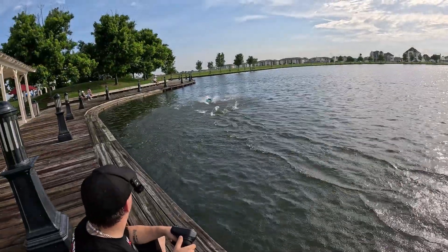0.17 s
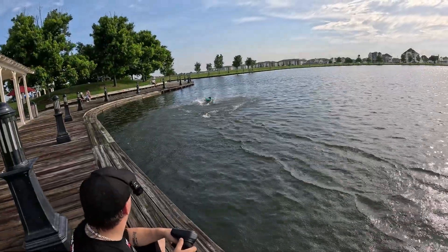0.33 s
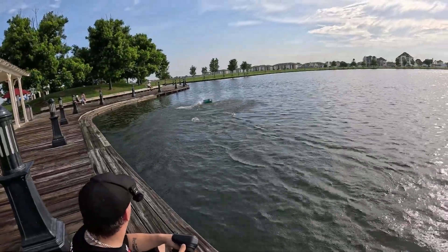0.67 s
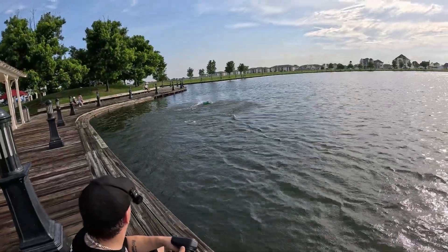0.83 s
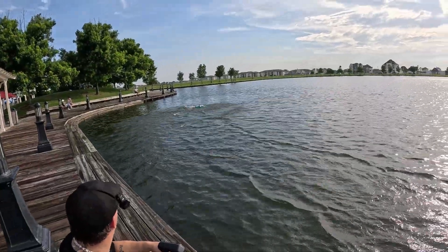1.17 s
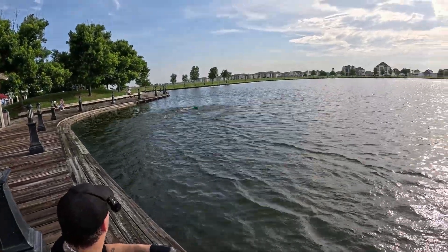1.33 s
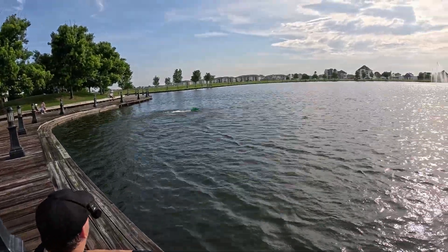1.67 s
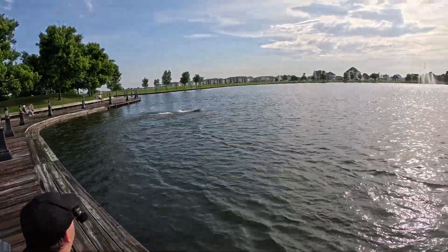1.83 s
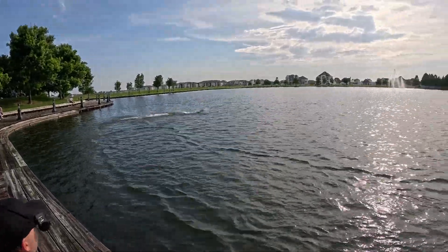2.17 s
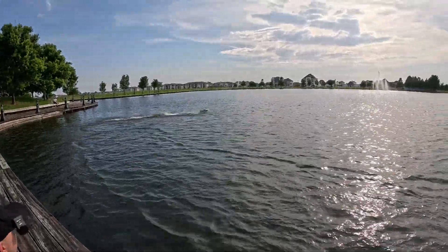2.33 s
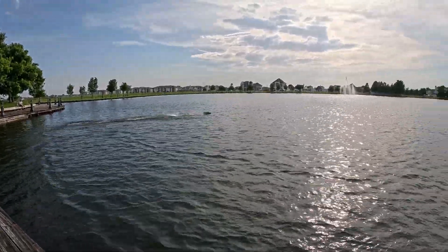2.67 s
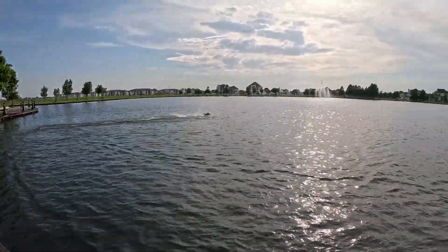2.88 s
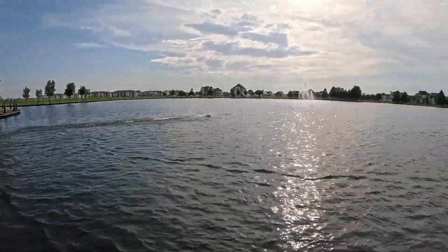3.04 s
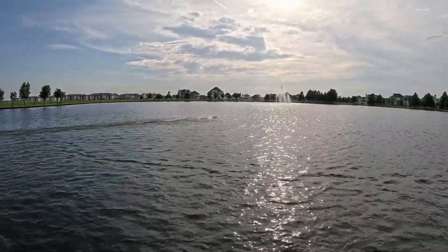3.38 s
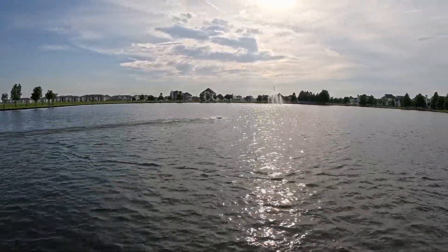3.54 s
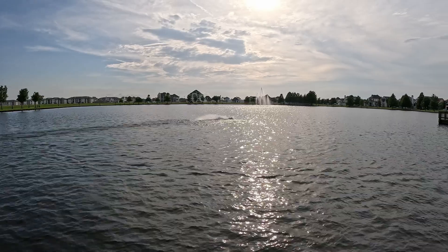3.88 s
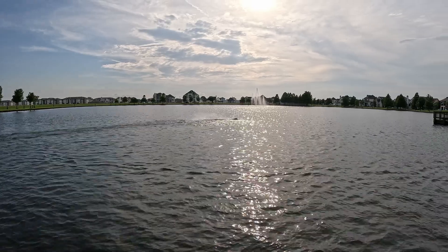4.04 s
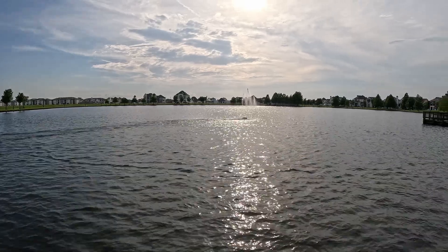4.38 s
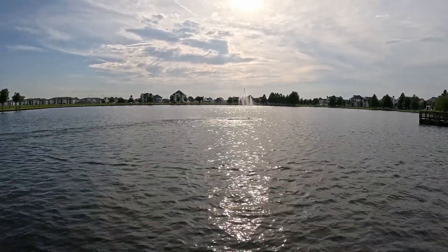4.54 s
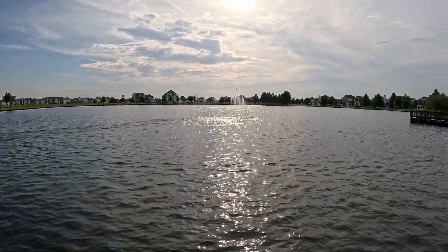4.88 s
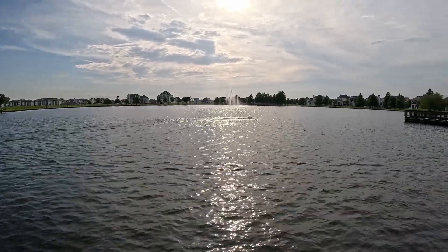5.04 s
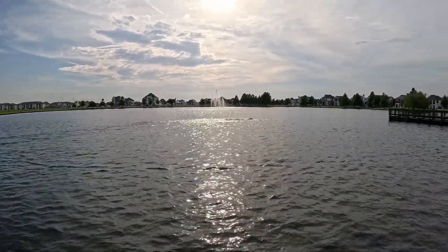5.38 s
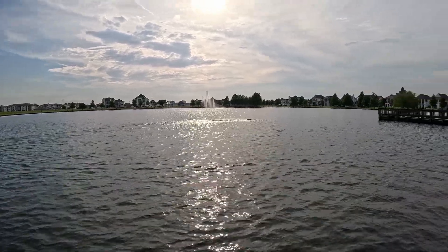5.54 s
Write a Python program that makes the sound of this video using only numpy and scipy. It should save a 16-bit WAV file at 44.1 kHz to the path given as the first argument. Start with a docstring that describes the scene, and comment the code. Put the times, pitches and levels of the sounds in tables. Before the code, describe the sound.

Outdoors on a pond dock, with a soft, steady lakeside wash and ripples lapping below. At 0-0.1 s a tight cluster of wet slaps lands, with drops pattering and thinning out; more slaps come near 0.5 and 0.8 s. At about 1.15 s a small electric jet boat spins up quickly to a buzzy mid-low whine with churning water and hissing spray. From 1.6 to 3.2 s the whine repeatedly leaps higher as the hull skips clear, then drops back with hollow, splashy slaps. It winds down by 3.3 s. A short burst at 3.6-3.95 s jumps sharply, then falls. Calm lapping follows, with a close, bright plastic creak of quickening ticks at 4.25 s and small slaps from 4.6 s. A last burst runs 5.0-5.5 s, with a fainter creak at 5.17 s and soft slaps, then water. A thin, dull echo returns from the bank.

```python
"""Watery slaps, pattering drops and lapping come first; then a small electric jet boat runs across a pond.
One long burst of throttle and two short ones drive an impeller whine, built from multiples of the shaft rate.
The whine races when the hull skips clear; churn and spray are shaped droplet noise, and hull slaps ring and splash.
A thin echo returns from the far bank, something near the microphone creaks twice in ringing ticks,
and a soft lakeside wash of filtered noise lies behind it all."""
import sys
import numpy as np
from scipy import signal
from scipy.fft import rfft, irfft
from scipy.io import wavfile
from scipy.ndimage import uniform_filter1d, map_coordinates

SR = 44100
rng = np.random.default_rng(int(sys.argv[2]) if len(sys.argv) > 2 else 0)


def unload_audio(sound):
    """Save the sound as a 16-bit wav file, at the path given as the first command line argument."""
    columns = np.transpose(np.atleast_2d(sound))
    # keep every value between -1 and 1, then stretch to whole-number steps
    steps = np.round(np.clip(columns, -1, 1) * 32767)
    wavfile.write(sys.argv[1], SR, steps.astype(np.int16))


N = 251811
T = np.arange(N) / SR


def undb(db):
    """Decibels to gain."""
    return 10 ** (np.asarray(db) / 20)


def unit(x):
    """Scale to an rms of 1."""
    return x / np.sqrt(np.mean(x ** 2) + 1e-24)


def colour(x, points):
    """Filter by a spectrum of (frequency [Hz], level [dB]) points, to an rms of 1."""
    hz, db = np.transpose(points)
    bins = np.maximum(np.fft.rfftfreq(len(x), 1 / SR), 1)
    gain = undb(np.interp(np.log(bins), np.log(hz), db))
    return unit(irfft(rfft(x) * gain, len(x)))


def resonate(x, hz, width):
    """Two-pole resonance with gain 1 at its centre."""
    return signal.lfilter(*signal.iirpeak(hz, hz / width, fs=SR), x)


def resonate_twice(x, hz, width):
    """The same resonance passed twice, for steeper sides."""
    return resonate(resonate(x, hz, width), hz, width)


def walk(rate):
    """Smooth chance with a spread near 1, changing rate times a second."""
    k = max(int(SR / rate), 1)
    steps = np.repeat(rng.standard_normal(N // k + 1), k)
    return 1.46 * uniform_filter1d(uniform_filter1d(steps, k), k)[:N]


def drops(rate, spread_db):
    """Random droplet impacts, rate a second on average: many small ones and a few large."""
    size = undb(spread_db * np.minimum(rng.exponential(size=N), 5))
    return unit((rng.random(N) < rate / SR) * size * rng.standard_normal(N))


def add(out, s, x):
    """Mix a short sound in at time s."""
    i = int(s * SR)
    out[i:i + len(x)] += x[:N - i]


def curve(points):
    """Join rows of (time [s], value, ..) by straight lines; one track for each value."""
    s, *columns = np.transpose(points)
    return [np.interp(T, s, c) for c in columns]


def lag(x, seconds):
    """Follow x with a time constant."""
    keep = np.exp(-1 / (seconds * SR))
    return signal.lfilter([1 - keep], [1, -keep], x)


# spectrum of the distant wash: (frequency [Hz], relative density [dB per Hz])
WASH_SPECTRUM = [(20, -38), (45, -6), (75, 6.5), (165, -9), (260, 7), (420, -11), (700, 1), (1300, -13),
                 (2000, -17), (3000, -11.5), (5500, -15.5), (8000, -22), (11000, -27), (15500, -40)]


def lakeside(wash_db=-66.5, lap_db=-69.5):
    """A distant fountain and town wash as steady noise, with ripples lapping under the dock as droplets."""
    wash = colour(rng.standard_normal(N), WASH_SPECTRUM) * undb(wash_db + 0.16 * walk(rate=3.93))
    lap_spectrum = [(40, -40), (110, 0.0), (165, 6.0), (260, -7.5), (700, -11.0), (3000, -40)]
    lapping = colour(drops(rate=370, spread_db=0.0), lap_spectrum)
    # the boat's first wash is still slopping against the piles at the start
    slop_db = np.interp(T, [0, 0.6, 4], [5, 1.5, 0])
    ripple_db = 2 * walk(rate=14)
    return wash + lapping * undb(lap_db + slop_db + ripple_db)


def pond(x, echo_db=-17, t60=0.99, first_s=0.036):
    """The dock and the tree-lined bank scatter a thin, dull echo, as sparse decaying reflections."""
    t = np.arange(SR) / SR
    scatter = rng.standard_normal(SR) * (rng.random(SR) < .01)
    tail = colour(scatter, [(100, -10), (400, 0.5), (2000, 3), (6000, -17), (14000, 0.5)])
    tail = tail * (t > first_s) * np.exp(-np.log(1000) * t / t60)
    return x + undb(echo_db) * signal.fftconvolve(x, tail / np.linalg.norm(tail))[:N]


# the two creaks: (start [s], length [s], first gap between slips [s],
#                  body level before trim [dB], top-octave level before trim [dB])
CREAK_STARTS = [(4.254, 0.135, 0.0224, -33.5, -47.5), (5.165, 0.043, 0.017, -40.5, -58.5)]
# each gap is shorter, each slip weaker, every second one fuller in the body
SLIP_QUICKEN_S, SLIP_FADE_DB, SLIP_ALTERNATE_DB = 0.002, 2.1, 8.5


def slips(count=10):
    """Stick-slip timing, ever faster and weaker: yields (time [s], body level [dB], top level [dB])."""
    for start, length, first_gap, db, top_db in CREAK_STARTS:
        for k in range(count):
            after = k * (first_gap - SLIP_QUICKEN_S * (k - 1) / 2)
            if after > length:
                break
            fade_db = SLIP_FADE_DB * k
            yield start + after, db - fade_db + SLIP_ALTERNATE_DB * (k % 2), top_db - fade_db


# ringing modes of the stiff plastic: (frequency [Hz], width [Hz], relative level [dB])
PLASTIC_MODES = [(1065, 140, -18), (2524, 370, -7.5), (4813, 360, -7.5), (5335, 180, -2.5),
                 (6350, 790, -8.5), (7340, 660, -6.5), (8770, 500, -3.5), (9450, 680, 2), (10540, 790, -3)]
# spectrum of one scrape: (frequency [Hz], relative density [dB per Hz])
SCRAPE_SPECTRUM = [(500, -10), (2000, -2), (6000, 0), (11000, -2), (13000, -10), (16000, -20)]


def creak(low_db=-13, high_db=-3, scrape_s=0.00051, tail_db=-19, tail_s=0.0046, crack_db=-9):
    """Stiff plastic slips in quickening ticks; each is a tiny bright scrape that rings the same short modes."""
    out, t = np.zeros(N), np.arange(SR // 40) / SR
    decay = np.exp(-t / scrape_s) + undb(tail_db) * np.exp(-t / tail_s)
    for s, db, top_db in slips():
        scrape = colour(rng.standard_normal(len(t)), SCRAPE_SPECTRUM) * decay
        add(out, s, undb(top_db + crack_db) * unit(scrape))
        for k, (hz, width, mode_db) in enumerate(PLASTIC_MODES):
            # high modes follow the top-octave level, the rest the body; polarity alternates
            strength_db = top_db + high_db if hz > SR / 6 else db + low_db
            ring = unit(resonate(scrape, hz, width)) / 2
            add(out, s, (-1) ** k * undb(strength_db + mode_db) * ring)
    return out


def patter(patter_db=-64, fade_s=0.86):
    """Single drops fall back near the dock as broad, damped plinks and thin out."""
    plinks = resonate(drops(rate=110, spread_db=2), 3300, 6000)
    bright = colour(plinks, [(300, 2), (1200, 9), (3000, 4.0), (7000, 2), (15000, -9)])
    return undb(patter_db) * bright * np.exp(-T / fade_s)


# the way from boat to dock: (time [s], lag of the bounce [s], strength of the bounce [gain], treble lift [dB])
BOAT_PATH = [(0, 0.0011, 0.11, 9.5), (1.7, 0.0008, 0.05, 2), (2.8, 0.00094, 0.17, 2),
             (3.75, 0.00086, 0.23, 1), (4.5, 0.000806, 0.21, 4.5), (5.25, 0.0007, 0.091, 1)]


def path(x):
    """A bounce off the dock combs the sound, its detour shifting as the boat moves; the treble lift shifts too."""
    detour, strength, treble_db = curve(BOAT_PATH)
    top = signal.sosfiltfilt(signal.butter(2, 7500, "high", fs=SR, output="sos"), x)
    x = x + (undb(treble_db) - 1) * top
    return x + strength * map_coordinates(x, [(T - detour) * SR], order=3)


# hull slaps and splashes: (time [s], rise [s], length [s], body level before trim [dB], cavity tone [Hz],
#   cavity ring against the body [dB], thump level before trim [dB], spray level before trim [dB])
HULL_SLAPS = [(0.07, 0.0004, 0.0069, -40, 1400, -7, -58, -61),
              (0.0778, 0.002, 0.0083, -29.5, 1680, -2, -47, -49),
              (0.09, 0.0007, 0.019, -38, 2420, -3, -47, -55), (0.115, 0.001, 0.015, -45, 604, 3, -57, -58),
              (0.462, 0.0011, 0.079, -42.5, 750, -6, -55.5, -62),
              (0.468, 0.00072, 0.0035, -31, 1040, 3, -55, -57),
              (0.483, 0.00092, 0.007, -34, 800, -6, -55, -63),
              (0.787, 0.0002, 0.01, -30.5, 1575, -0.5, -72, -53.5),
              (0.794, 0.0029, 0.033, -42, 800, -3, -51.5, -66),
              (1.154, 0.015, 0.038, -37, 1280, -19, -50, -62),
              (1.62, 0.0005, 0.028, -32, 737.6, 12, -39, -54),
              (1.639, 0.0021, 0.04, -27.5, 800, -1.5, -51.5, -52.5),
              (1.712, 0.0036, 0.015, -49, 497, 2, -38, -45.5),
              (1.755, 0.0044, 0.034, -27.5, 800, 0.5, -47, -52),
              (1.937, 0.0004, 0.031, -27.5, 773, 5, -46, -48.5),
              (2.095, 0.0091, 0.016, -21.5, 480, -7, -51, -41),
              (2.126, 0.0028, 0.015, -39.5, 742, 15.5, -41.5, -66),
              (2.246, 0.0059, 0.035, -28, 1260, -8, -45, -50),
              (2.411, 0.0018, 0.012, -34, 1101, -5, -59, -49),
              (2.438, 0.0072, 0.02, -24, 1400, -2, -53, -43),
              (2.555, 0.0039, 0.032, -29.5, 960, -4, -40, -47),
              (2.729, 0.0041, 0.019, -24.5, 1520, -2, -39.5, -42),
              (2.828, 0.0041, 0.033, -42, 1068, 8, -53, -55),
              (2.86, 0.004, 0.037, -30, 960, -3, -42.5, -65),
              (3.059, 0.00056, 0.014, -27.5, 1188, -4, -45.5, -48.5),
              (3.184, 0.0034, 0.03, -34, 909, 2, -44, -53),
              (3.494, 0.0006, 0.011, -39, 1217, 1.5, -56.5, -59),
              (3.731, 0.002, 0.013, -37, 915, 7, -52, -51),
              (3.764, 0.0004, 0.017, -29.5, 581.7, 2, -45, -45),
              (4.056, 0.0029, 0.023, -53, 1014, 8, -52, -82),
              (4.563, 0.0045, 0.031, -45.5, 616, 6, -66, -60.5),
              (4.907, 0.0068, 0.027, -42, 1432, -9, -76, -55),
              (4.957, 0.0077, 0.051, -57, 620, 16, -75, -75),
              (5.273, 0.011, 0.03, -28.5, 708, -1, -58, -70),
              (5.345, 0.0049, 0.043, -40.5, 1577, 2.5, -62, -59),
              (5.404, 0.003, 0.015, -42, 599, 10, -68, -68)]
# spectrum of the blow's body: (frequency [Hz], relative density [dB per Hz])
SLAP_SPECTRUM = [(200, -11), (450, 6), (800, 1), (1350, 5), (1900, -1.5), (2300, -2.5), (3000, -8.5),
                 (6000, -40)]
# spectrum of thrown spray, shared with the wake: (frequency [Hz], relative density [dB per Hz])
SPRAY_SPECTRUM = [(1200, -23), (2400, -6), (2950, -8), (3400, 2), (4300, 0), (5800, -2), (7700, -9),
                  (8500, -16), (9400, -16.5), (10500, -20.5), (13000, -27), (16000, -40)]
IDLE_THUMP_HZ = 170  # the hull's own thump; a faster shaft, jolted by the blow, thumps at its own rate


def slaps(shaft_hz, body_db=-14, thump_db=-1, splash_db=-2, cavity_width_hz=240, thump_width_hz=140,
          tail_db=-20, tail_s=0.32):
    """Each blow of the water thumps the hull, rings a pocket of trapped air and throws a sheet of spray."""
    out, t = np.zeros(N), np.arange(SR // 5) / SR
    for s, rise_s, length_s, db, cavity_hz, ring_db, low_db, high_db in HULL_SLAPS:
        water, air, hull, mist, clump = rng.standard_normal((5, len(t)))
        thump_hz = max(shaft_hz[int(s * SR)], IDLE_THUMP_HZ)
        # the water strikes in clumps about a millisecond long
        clumps = np.exp(.26 * unit(uniform_filter1d(clump, size=48)))
        attack = 1 - np.exp(-t / rise_s)
        blow = attack * np.exp(-(t / length_s) ** 2)
        splash = blow + attack * undb(tail_db) * np.exp(-t / tail_s) * (1 - t / t[-1])
        body = colour(water * clumps, SLAP_SPECTRUM)
        cavity = resonate_twice(air, cavity_hz, cavity_width_hz)
        thump = resonate_twice(hull, thump_hz, thump_width_hz)
        spray = colour(mist * clumps, SPRAY_SPECTRUM)
        parts = [(body, splash, db + body_db), (cavity, blow, db + body_db + ring_db),
                 (thump, blow, low_db + thump_db), (spray, splash, high_db + splash_db)]
        for part, shape, part_db in parts:
            # each part carries the energy of its envelope
            add(out, s, undb(part_db) * np.sqrt(np.mean(shape ** 2)) * unit(shape * part))
    return out


# one curve for each burst of throttle: (time [s], shaft rate in the water [Hz],
#   then levels of the shaft, blade, third, fourth and sixth tones [dB])
THROTTLE_BURSTS = [
    [(1.14, 158, -56, -73, -87, -65, -76), (1.24, 292, -58.5, -54, -58, -65, -61),
     (1.3, 306, -50, -57, -65, -63, -60), (1.35, 332, -49.5, -45.5, -67, -56, -62),
     (1.385, 336.4, -65, -63, -54, -49, -63), (1.445, 341, -43.5, -48, -59, -54, -62),
     (1.48, 339.6, -54, -51, -48, -59, -54), (1.53, 343.3, -40.5, -45, -56, -48, -59),
     (1.61, 341.5, -55, -50, -49, -58, -56), (1.775, 340, -42, -46, -58, -60, -58),
     (1.82, 340.2, -54, -51, -64, -55, -51), (1.88, 339.5, -48.5, -50, -63, -46.5, -58),
     (2.22, 336.2, -53, -52, -55, -52, -59), (2.45, 358.8, -50, -53, -55, -49, -54),
     (2.52, 361, -49, -46.5, -49, -48, -49), (2.76, 361, -57, -51, -46, -47, -55),
     (2.83, 360, -50, -51.5, -47, -61, -36.5), (3.06, 359.2, -43, -58, -48, -60, -57),
     (3.13, 359.5, -55, -61, -48.5, -56, -47.5), (3.19, 359.5, -50, -57, -47, -57, -58),
     (3.32, 233, -75, -92, -73, -76, -92)],
    [(3.6, 178.7, -75, -70, -69, -68, -68), (3.64, 277, -54, -62, -68, -54, -89),
     (3.685, 345.2, -52.5, -64, -60, -58, -60), (3.706, 368, -57.5, -63, -50, -55, -38),
     (3.735, 444, -45, -48, -59, -55, -72), (3.754, 440.3, -52, -62, -64, -59, -66),
     (3.8, 420, -44.5, -52, -64, -57, -55), (3.87, 384.8, -51, -60, -68, -61, -54),
     (3.945, 264, -48, -56, -55, -53, -88)],
    [(5.02, 153, -55, -69, -68, -72, -68), (5.06, 252, -64, -71, -71, -56, -63),
     (5.115, 330.7, -60, -44.5, -70, -62, -61), (5.165, 341.3, -57, -46, -63, -62, -55),
     (5.21, 343.4, -49.5, -63, -67, -61, -59), (5.27, 348, -55, -58, -58, -51, -60),
     (5.38, 377.6, -46, -45, -55, -61, -74), (5.44, 286.7, -67, -63, -69, -75, -76),
     (5.5, 200, -74, -73, -76, -82, -84)],
]
# the hull skips clear and the unloaded impeller races: (leaves [s], lands [s],
#   time the shaft takes to answer [s], free shaft rate [Hz], then levels of the same five tones [dB])
HULL_SKIPS = [(1.643, 1.763, 0.02, 479.3, -46.5, -64, -54.5, -56, -68),
              (1.937, 2.108, 0.019, 488, -45.5, -52.5, -50.5, -62.5, -64),
              (2.25, 2.432, 0.018, 482.3, -55.5, -50, -51.5, -58.5, -66),
              (2.556, 2.732, 0.014, 539.4, -47, -53.5, -66, -53, -63),
              (2.853, 3.058, 0.015, 538.1, -58, -53, -68, -54.5, -86),
              (3.169, 3.211, 0.0203, 459, -45.5, -46, -56, -68, -63),
              (3.758, 3.777, 0.0029, 591.8, -40.5, -40, -53, -41.5, -64),
              (5.279, 5.353, 0.01785, 501, -46, -58, -51, -66, -71)]
# multiples of the shaft rate that carry the whine: shaft, two-blade, third, fourth, sixth tones
MAIN_TONES = [1, 2, 3, 4, 6]
BRAKE_SHARE = 0.6  # share of the answer time in which the water brakes the shaft again
HALF_OUT_DULL_DB = -4.5  # the froth of a half-immersed impeller smothers the tones above the blade tone
# froth is roughness 0-1 from air drawn into the jet: in the water, in the air
FROTH_WET, FROTH_DRY = 0.05, 0.014
# added froth: half out, speeding up, slowing down
FROTH_HALF_OUT, FROTH_OPENING, FROTH_CLOSING = 0.86, 0.081, 0.84
BRISK_HZ_PER_S = 2500  # a change of shaft rate that brings the full froth
FROTH_LAG_S = 0.028  # time the froth takes to follow a change of throttle


def motor():
    """Throttle sets the shaft rate, skips unload it: rate, share in air, froth, tone levels, on or off."""
    hz, *tones_db = curve(np.vstack(THROTTLE_BURSTS))
    running = np.zeros(N)
    for run in THROTTLE_BURSTS:
        inside_s = np.minimum(T - run[0][0], run[-1][0] - T)
        running = running + np.clip(inside_s / 0.0041, 0, 1)
    change = np.clip(np.gradient(hz, T) / BRISK_HZ_PER_S, -1, 1)
    air = np.zeros(N)
    for leaves, lands, answer_s, free_hz, *free_db in HULL_SKIPS:
        racing = 1 - np.exp(-np.clip(T - leaves, 0, lands - leaves) / answer_s)
        clear = racing * np.exp(-np.maximum(T - lands, 0) / (BRAKE_SHARE * answer_s))
        air = air + clear
        hz = hz + clear * (free_hz - hz)
        tones_db = [db + clear * (free - db) for db, free in zip(tones_db, free_db)]
    half_out = 1 - (2 * air - 1) ** 2
    dull_db = HALF_OUT_DULL_DB * half_out
    tones_db = [db + dull_db * (multiple > 2) for multiple, db in zip(MAIN_TONES, tones_db)]
    stirred = FROTH_OPENING * np.maximum(change, 0) + FROTH_CLOSING * np.maximum(-change, 0)
    froth = FROTH_WET * (1 - air) + FROTH_DRY * air + FROTH_HALF_OUT * half_out + lag(stirred, FROTH_LAG_S)
    return hz, air, np.clip(froth, 0, 1), np.array(tones_db), running


def glitter(x, depth_db, rate):
    """Paths over the moving ripples interfere, so narrow bands swell and fade on their own."""
    spectrum = signal.stft(x, nperseg=512)[2]
    frames = max(int(SR / 256 / rate), 1)
    chance = rng.standard_normal(spectrum.shape)
    swell = unit(uniform_filter1d(uniform_filter1d(chance, frames, axis=1), size=2, axis=0))
    return unit(signal.istft(spectrum * undb(depth_db * swell))[1][:N])


# spectrum of the churned water: (frequency [Hz], relative density [dB per Hz])
CHURN_SPECTRUM = [(120, -29), (250, -12), (400, -2), (800, -3), (1400, 0), (1850, -5.5), (2350, -6),
                  (2950, -12), (5000, -49)]
# wake at cruising rate, as the boat turns and draws away:
#   (time [s], churning before trim [dB], spray [dB], panel rasp [dB])
JET_LEVELS = [(1.3, -53, -59, -64), (1.55, -47.5, -53, -53), (1.85, -49, -57.5, -68),
              (2.15, -47, -53.5, -59), (2.8, -51.5, -54, -55), (3.15, -47, -58, -59), (3.3, -53, -56, -73),
              (3.75, -50.5, -56, -63), (5.15, -52.5, -56, -66), (5.45, -56, -59, -74)]
# disturbed water that the boat leaves behind: (time [s], churning before trim [dB], spray [dB])
SETTLING_LEVELS = [(0.0, -53, -61.5), (0.27, -58.5, -62), (0.6, -61.5, -65.5), (0.95, -61.5, -69.5),
                   (3.3, -61, -65.5), (4.42, -61.5, -62.5), (4.8, -66.5, -71), (5.71, -64, -65.5)]
# the wake grows with a power of the shaft rate and eases in a skip
CRUISE_HZ, WAKE_POWER, WAKE_LAG_S = 353, 2.65, 0.00088
AIRBORNE_CHURN_DB, AIRBORNE_SPRAY_DB = -6.5, -2.5
PANEL_HZ, PANEL_WIDTH_HZ = 2226, 330  # a hull panel that rasps while the jet is loaded


def wake(shaft, air, running, chop=0.069, churn_db=-1):
    """Churn, spray and panel rasp grow with the loaded shaft rate; the impeller chops the jet once a turn."""
    loaded_hz = curve(np.vstack(THROTTLE_BURSTS))[0]
    thrust = lag(running * (loaded_hz / CRUISE_HZ) ** WAKE_POWER, WAKE_LAG_S)
    jet_churn_db, jet_spray_db, panel_db = curve(JET_LEVELS)
    settling_churn_db, settling_spray_db = curve(SETTLING_LEVELS)
    churn_gain = np.hypot(thrust * undb(jet_churn_db + AIRBORNE_CHURN_DB * air), undb(settling_churn_db))
    spray_gain = np.hypot(thrust * undb(jet_spray_db + AIRBORNE_SPRAY_DB * air), undb(settling_spray_db))
    churn = glitter(colour(drops(rate=4000, spread_db=0.5), CHURN_SPECTRUM), depth_db=3.0, rate=16)
    churn = churn * churn_gain * undb(churn_db + 0.053 * walk(rate=210))
    spray = glitter(colour(drops(rate=14000, spread_db=0.5), SPRAY_SPECTRUM), depth_db=3.5, rate=14)
    spray = spray * spray_gain * undb(0.5 * walk(rate=77))
    panel = resonate_twice(drops(rate=1500, spread_db=0.5), PANEL_HZ, PANEL_WIDTH_HZ)
    rasp = unit(panel) * thrust * (1 - air) * undb(panel_db)
    return (churn + spray + rasp) * (1 + chop * shaft)


# fainter tones: (multiple of the shaft rate)
FAINT_TONES = [2.31, 2.52, 4.27, 5, 8, 10, 12]
# their levels against the mean of the main tones, in the water and in the air: (level [dB])
FAINT_LEVELS_WET = [-19, -5, -11.5, -9, -11, -11, -10.5]
FAINT_LEVELS_DRY = [-4, -11, -7, -6, -10, -22, -11]
# share by which the shaft rate wavers: quickly on its own, slowly as ripples load it (less in the air)
UNSTEADY, RIPPLE_SWAY = 0.002, 0.005
FLUTTER_DB = 1.8  # each tone swells and fades by about this much as the boat rides the ripples


def impeller(hz, air, rough, tones_db, running, shake_db=3, froth_hz=260):
    """Shaft tone, blade tone and overtones, shaken by uneven water load; also returns the shaft's swing."""
    waver = UNSTEADY * walk(rate=140) + RIPPLE_SWAY * (1 - 0.7 * air) * walk(rate=24)
    angle = 2 * np.pi * np.cumsum(hz * (1 + waver)) / SR

    def partial(multiple, db):
        """One line; froth shakes it and scatters part of it into a skirt, the more so the higher it lies."""
        share = 1 - (1 - rough) ** (multiple / 2)
        phase = multiple * angle + 2 * np.pi * rng.random()
        skirt = walk(rate=froth_hz) * np.sin(phase) + walk(rate=froth_hz) * np.cos(phase)
        line = np.sqrt(1 - share) * np.sin(phase) + np.sqrt(share / 2) * skirt
        return undb(db + FLUTTER_DB * walk(rate=30) + shake_db * rough * walk(rate=51)) * line

    out = sum(partial(multiple, db) for multiple, db in zip(MAIN_TONES, tones_db))
    mean_db = tones_db.mean(axis=0)
    for multiple, wet_db, dry_db in zip(FAINT_TONES, FAINT_LEVELS_WET, FAINT_LEVELS_DRY):
        out += partial(multiple, mean_db + wet_db + air * (dry_db - wet_db))
    return running * out, running * np.cos(angle)


def scene():
    """The boat out on the pond, heard from the dock."""
    hz, air, froth, tones_db, running = motor()
    whine, shaft = impeller(hz, air, froth, tones_db, running)
    water = path(wake(shaft, air, running) + slaps(hz * running))
    boat = pond(whine + water + patter())
    return (boat + creak() + lakeside())[None]


def record(dry):
    """A high-pass thins the deepest bass and a steep low-pass cuts the top of the treble."""
    thinned = signal.sosfilt(signal.butter(3, 45, "high", fs=SR, output="sos"), dry)
    return signal.sosfilt(signal.ellip(10, .1, 70, 15700, fs=SR, output="sos"), thinned)


dry = scene()
out = record(dry)
unload_audio(out)
```